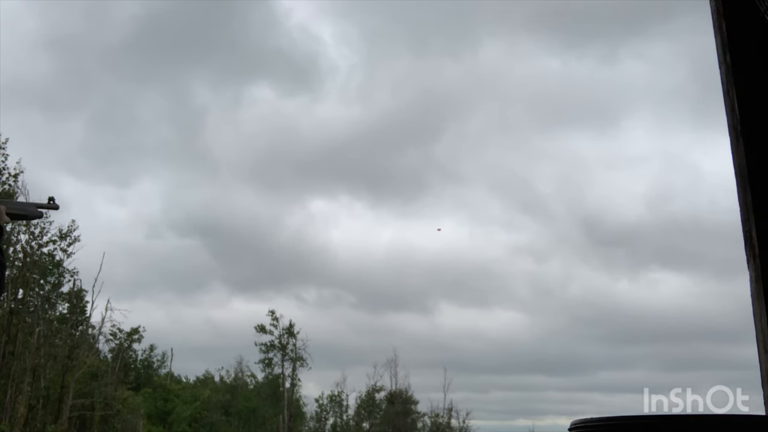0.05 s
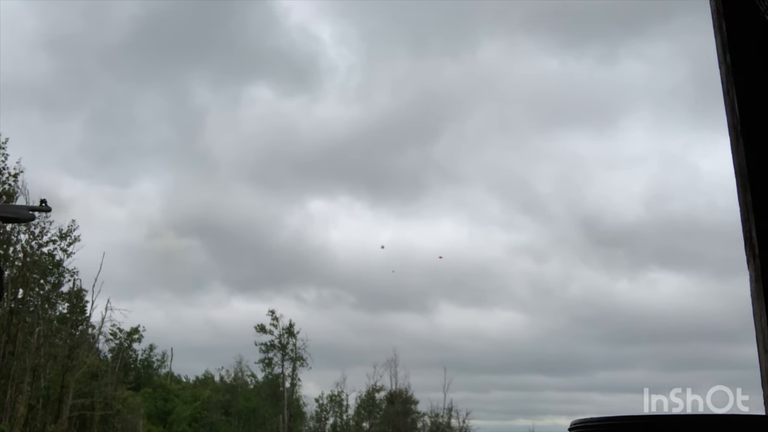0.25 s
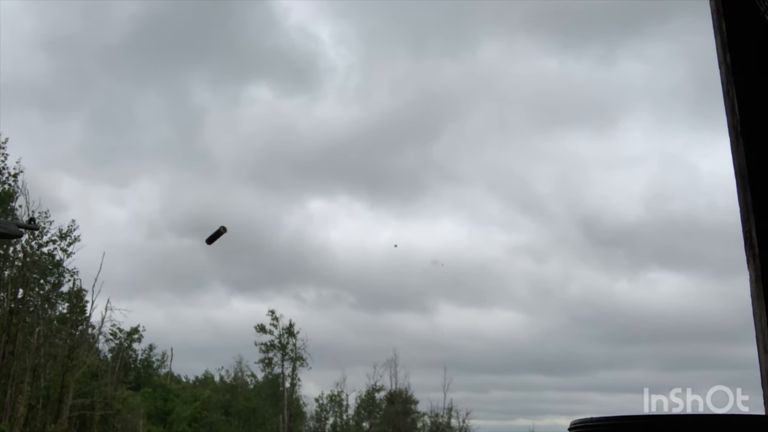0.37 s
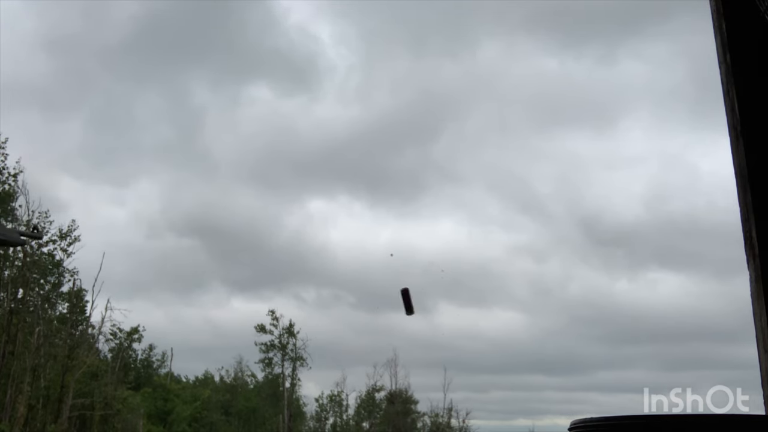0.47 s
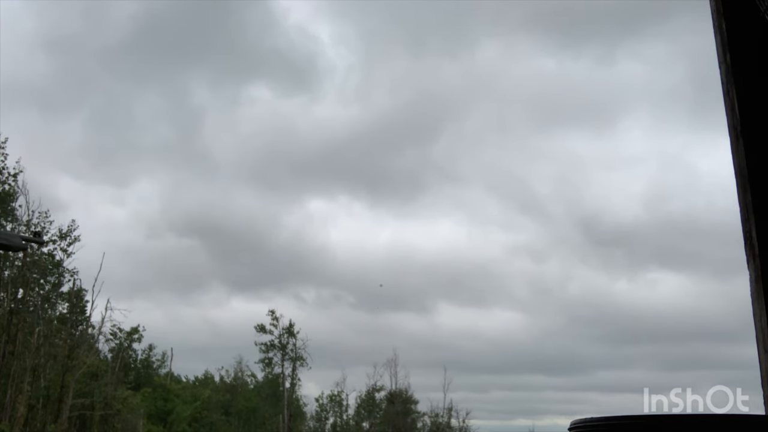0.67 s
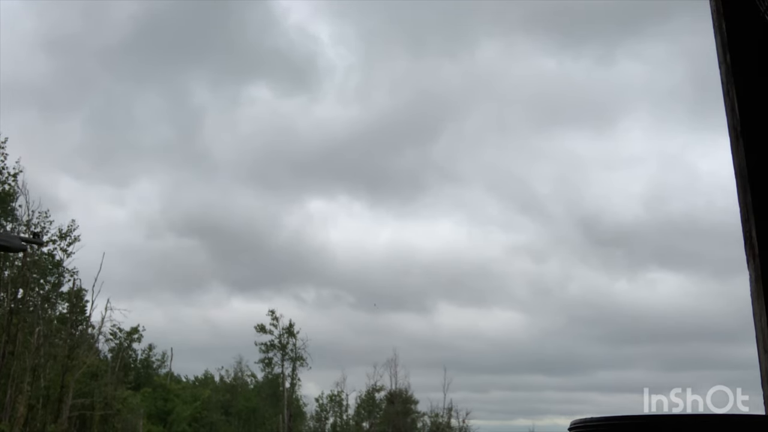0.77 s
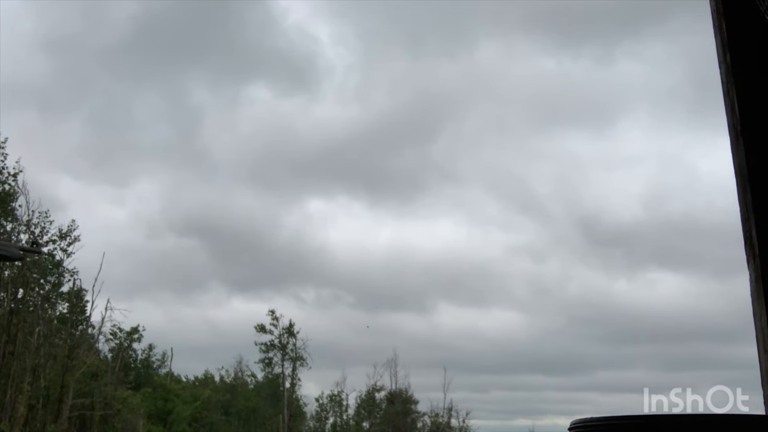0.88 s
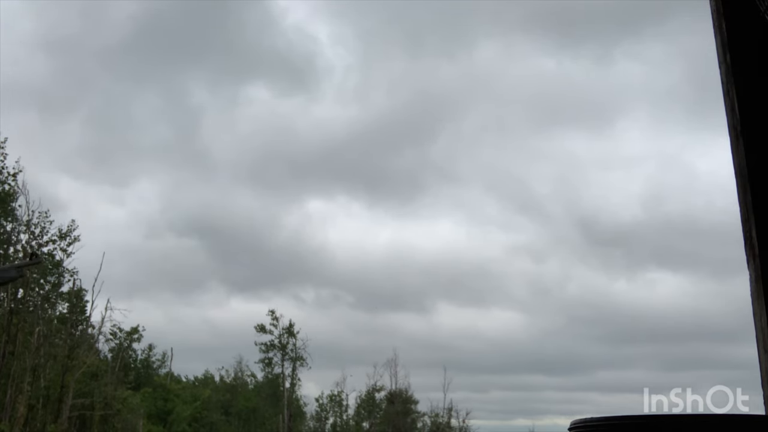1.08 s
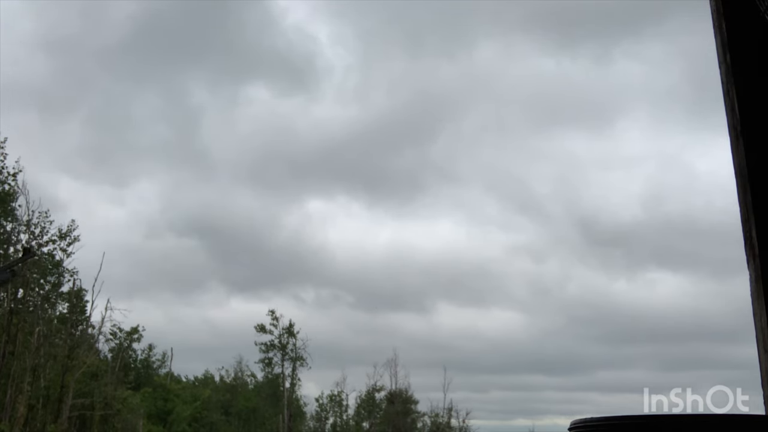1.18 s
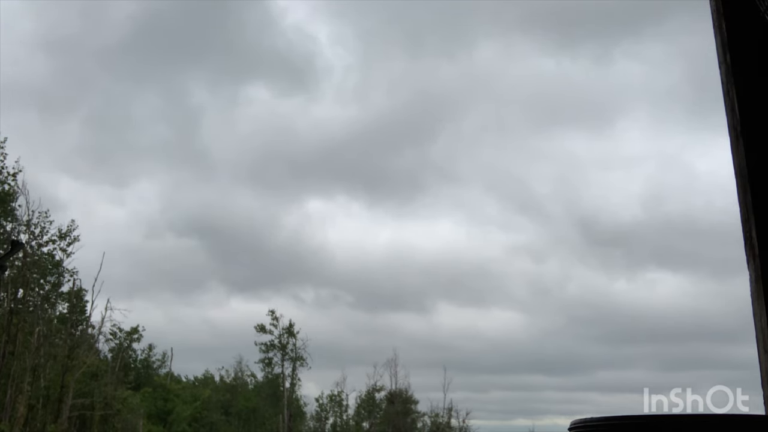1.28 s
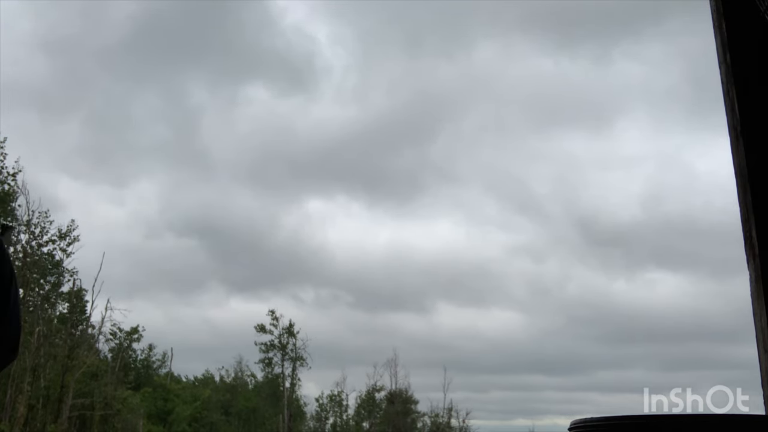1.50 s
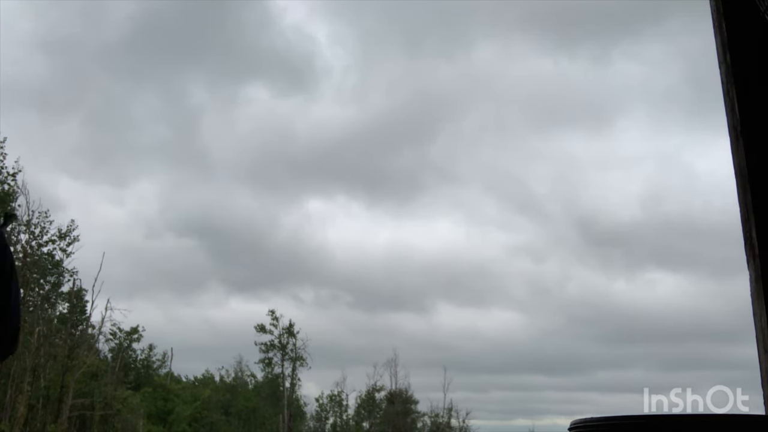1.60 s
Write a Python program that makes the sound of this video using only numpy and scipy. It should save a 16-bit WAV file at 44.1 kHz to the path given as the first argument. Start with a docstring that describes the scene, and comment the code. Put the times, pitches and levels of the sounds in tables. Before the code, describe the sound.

A shotgun fires once, close to the microphone, with a hard crack and a loud blast. The echo rolls back from the trees around a clearing, followed by faint clicks and knocks of the gun being handled.

```python
"""A clearing ringed by trees: one shotgun shot at a clay target, close to a two-port microphone.
A hard crack opens into a bright blast with low pressure thumps that overloads the microphone,
and the barrel rings on. Nearby things slap the shot back; the tree lines roll it back, duller
with distance. The gun clicks and knocks faintly as it is handled, over a light gust and low rumble."""
import sys
import numpy as np
from scipy import signal
from scipy.fft import rfft, irfft
from scipy.io import wavfile

SR = 44100
rng = np.random.default_rng(int(sys.argv[2]) if len(sys.argv) > 2 else 0)


def to_wav(s):
    """Save 16-bit WAV."""
    ch = np.atleast_2d(s).T  # columns
    pcm = np.round(np.clip(ch, -1, 1) * 32767)  # PCM
    wavfile.write(sys.argv[1], SR, pcm.astype(np.int16))


N = 72765
T, HZ = np.arange(N) / SR, np.fft.rfftfreq(N, 1 / SR)
CRACK_S, BLAST_S, SNAP_S, BLAST_RISE_S = .1962, .215, .218, .011


# the crack close up, at the left and right port (frequency [Hz], level [dB])
CRACK_LEFT = [(40, -21), (130, -12.5), (320, -1.5), (700, -4.5), (1050, -15.5), (1750, 3), (2500, -10.5),
              (3200, -3), (4600, -6), (6000, -18), (7400, -7)]
CRACK_RIGHT = [(40, -20.5), (130, -3), (320, 1), (750, -6.5), (1130, -1), (1550, -16.5), (2100, 0),
               (2600, -16.5), (4300, -8.5), (6000, -17), (7400, -14)]
def crack():
    """The first hard burst overloads the microphone; its bass swells just behind the rest."""
    burst = noise(np.array([read(CRACK_LEFT), read(CRACK_RIGHT)]))
    bass = filtered(burst, lowpass(614, slope=4))
    attack = (burst - bass) * rise(CRACK_S, .0055) ** 2 + bass * rise(CRACK_S, .014) ** 2
    drive, hold_s = .44, .017
    overloaded = np.tanh(drive * attack * amp(fall_db(CRACK_S + hold_s, t60=.09))) / drive
    return amp(-5) * filtered(overloaded, np.sqrt(lowpass(7730, slope=90)))


# the blast close up (frequency [Hz], level [dB])
BLAST_COLOUR = [(25, -7), (42, -3), (62, -16.5), (110, -4), (200, -2), (450, -2), (800, -2.5), (1500, -7),
                (2200, -8.5), (3300, -9.5), (5000, -15), (7000, -15.5), (9000, -15.5), (14000, -16),
                (16000, -20)]
# how long it rings (frequency [Hz], t60 [s])
BLAST_T60 = [(40, 0.48), (120, 0.24), (400, 0.28), (1200, .25), (3000, 0.24), (7000, 0.24), (14000, 0.1)]
# resonances around the shooter (frequency [Hz], width [Hz], boost [dB])
RESONANCES = [(136, 9, 7.5), (318, 33, 6.5), (461, 30, 5), (548, 12, 8.5), (629, 39, 9.5), (972, 27, 12),
              (1089.6, 49, 13.5), (1272, 35, 11), (1790, 45, 6.5)]
def blast():
    """The roar rings the surroundings and dies, treble first; a near wall of trees throws it back."""
    rings_db = sum(db * np.exp(-((HZ - hz) / width) ** 2) for hz, width, db in RESONANCES)
    burst = noise(read(BLAST_COLOUR) + rings_db, pan_db=1)
    roar = by_band(burst, lambda hz: fall_db(BLAST_S + .0033, read(BLAST_T60, hz)), count=14)
    bounce_db = 1.5 * bell(.2495, width_s=.012)
    return amp(-9 + bounce_db) * rise(BLAST_S, BLAST_RISE_S) * roar


# the bright top of the blast (frequency [Hz], level [dB])
SNAP_COLOUR = [(500, -23.5), (6000, -3.5), (9000, -5), (13500, 0), (16000, -5.5)]
def snap():
    """A sharp snap tops the blast; nearby leaves scatter it into a faint sizzle."""
    colour = read(SNAP_COLOUR)
    direct = noise(colour) * rise(SNAP_S, .0012) * amp(-11.5 + fall_db(SNAP_S, t60=.022))
    sizzle = noise(colour) * rise(SNAP_S, BLAST_RISE_S) * amp(-40 + fall_db(SNAP_S, t60=.45))
    return direct + sizzle


# pressure pulses at the microphone (time [s], peak [linear], length [s])
THUMPS = [(0.2175, .14, .002), (0.2265, 0.33, 0.0016), (0.245, .11, 0.0018)]
def thumps():
    """The pressure wave and its near reflections: each a push between two suctions."""
    return sum(peak * (1 - ((T - s) / length) ** 2) * np.exp(-((T - s) / length) ** 2 / 2)
               for s, peak, length in THUMPS)


BARREL_HZ, BARREL_WIDTH_HZ = (2860, 3235, 3270), 24
def barrel():
    """A few narrow steel modes of the barrel, struck by the shot."""
    modes = sum(1 / (1 + ((HZ - hz) / BARREL_WIDTH_HZ) ** 2) for hz in BARREL_HZ)
    envelope = rise(BLAST_S, BLAST_RISE_S) * amp(-29 + fall_db(BLAST_S, t60=.33))
    return noise(20 * np.log10(modes)) * envelope


# returns from things nearby, then from the edge of the wood (time [s], level [dB], pitch [Hz])
SLAPS = [(.2124, -10, 310), (0.2323, -11, 1007), (.2509, -14, 408), (.2726, -18, 442), (.314, -28.5, 333),
         (.5227, -34, 1240), (.5238, -34, 570), (.5379, -30, 1200), (0.7078, -29.5, 810),
         (0.7139, -37, 870), (0.719, -31, 970), (0.7321, -36, 1000), (0.739, -33.5, 905)]
def slaps():
    """Separate hollow returns, each a few cycles long, reaching the left port first."""
    port_time = T - np.array([[0], [.0001]])
    out = 0
    for s, db, hz in SLAPS:
        cycles = hz * (port_time - s)
        out += amp(db) * np.exp(-(cycles / 1.4) ** 2) * np.cos(2 * np.pi * (cycles + rng.random()))
    return out


# tree lines, near to far (peak time [s], level [dB], rise [s], t60 [s], treble [dB])
TREE_LINES = [(0.392, -47, 0.035, 0.92, 2), (0.481, -40, 0.045, 1, -3), (0.538, -34.5, 0.032, 0.64, -2),
              (0.636, -34, 0.024, 0.3, -5), (0.716, -43, 0.036, 0.68, 4),
              (0.755, -35.5, 0.0097, 0.071, -19), (0.807, -45, 0.014, 0.39, -5.5),
              (.85, -47, 0.036, 1, 0.5), (1.12, -52.5, .05, 0.27, -3.5), (1.21, -57.5, 0.1, 0.99, 4.5),
              (1.6, -62, 0.043, 0.51, -1)]
# the shot heard back from the trees (frequency [Hz], level [dB])
ECHO_COLOUR = [(30, -14), (70, -9.5), (160, -3.5), (240, -9.5), (420, -1.5), (580, -1), (750, -4.5),
               (1050, -2.5), (1450, -9.5), (1750, -6.5), (2200, -10.5), (4500, -18), (8000, -29),
               (12000, -41), (16000, -44.5)]
def echoes():
    """Each tree line scatters a grainy swell back; the air takes treble from the later ones."""
    def level_db(hz):
        treble = hz ** 2 / (hz ** 2 + 1604 ** 2)
        power = 0
        for s, db, rise_s, t60, treble_db in TREE_LINES:
            swell = np.exp(-(np.minimum(T - s, 0) / rise_s) ** 2)
            power += swell * amp(db + treble_db * treble + fall_db(s, t60)) ** 2
        air_db_per_s = 6 * min(hz, 4500) / 1000
        return 10 * np.log10(power + 1e-20) - air_db_per_s * (T - .59)

    grain_db = np.interp(T / .003, np.arange(N), rng.standard_normal(N))  # a new level every 3 ms
    roll = by_band(noise(read(ECHO_COLOUR), pan_db=.5), level_db, count=8)
    return roll * amp(grain_db) * rise(BLAST_S, BLAST_RISE_S)


# the gun's action, close by (time [s], level [dB], treble [dB])
CLICKS = [(0.597, -58, 9.5), (.610, -63, 8), (1.019, -74.5, 5), (1.101, -65.5, 2.5), (1.119, -70.5, 1),
          (1.167, -80, 5), (1.209, -72, 1), (1.218, -65, 4.5), (1.306, -73, 0), (1.429, -76, 7),
          (1.49, -80, 0)]
# the clicks' bright ringing colour as picked up, with two hollows in the high treble
# (frequency [Hz], level [dB])
CLICK_COLOUR = [(800, -23), (3000, -16), (3700, 12), (4000, 10), (4420, 17.5), (4900, -1), (5600, 2),
                (6500, 7), (8000, 4.5), (9400, -12), (10500, 3), (13600, -14), (14900, 2), (16000, -15)]
def clicks():
    """Small steel parts tick and ring briefly, some brighter than others."""
    ringing = noise(read(CLICK_COLOUR))
    treble = filtered(ringing, 1 - lowpass(5500, slope=10))
    out = 0
    for s, db, treble_db in CLICKS:
        tick_and_ring = amp(fall_db(s, t60=.035)) + amp(-5 + fall_db(s, t60=.19))
        out += (ringing + (amp(treble_db) - 1) * treble) * rise(s, .001) * amp(db) * tick_and_ring
    return out


# bumps on the stock, close by (time [s], level [dB], pitch [Hz])
KNOCKS = [(1.043, -47, 483), (1.072, -49.5, 352), (1.164, -49.5, 366)]
def knocks():
    """Each soft bump rings the stock with one dull note."""
    return sum(rise(s, .0052) * amp(db + fall_db(s, t60=.08)) * np.sin(2 * np.pi * hz * (T - s))
               for s, db, hz in KNOCKS)


# wind on the microphone (frequency [Hz], level [dB])
WIND_COLOUR = [(20, -19), (45, 7), (80, 7), (130, -7), (220, -37), (1000, -57)]
def wind():
    """One light, slow gust rumbles on the microphone."""
    return amp(-64.5) * noise(read(WIND_COLOUR)) * bell(1.12, width_s=.21)


# hiss and rumble of the clearing, all around (frequency [Hz], level [dB])
HISS = [(30, -8.5), (80, -3), (580, -7), (1000, -10.5), (4600, -12), (5500, -20.5), (8000, -27),
        (10000, -37), (16000, -51)]
RUMBLE = [(25, -13), (60, -4.5), (170, -15), (240, -25.5), (340, -8.5), (430, -5), (520, -14.5),
          (620, -11), (1050, -17), (1650, -24.5), (5000, -36.5), (16000, -55.5)]
def air():
    """A low outdoor rumble, and a faint hiss that drops away after the shot."""
    hiss = amp(-56) * noise(read(HISS)) * (1 - rise(CRACK_S, .4))
    return hiss + amp(-64.5) * noise(read(RUMBLE))


# how alike the two microphone ports hear (frequency [Hz], likeness [0-1])
PORT_LIKENESS = [(40, 0.9), (130, 1), (300, 0.8), (600, 0.6), (1100, 0.25), (1800, 0.3), (3000, 0),
                 (6000, 0), (7300, 0.3), (12000, 1)]
def noise(colour_db, pan_db=0, lag_s=.00017):
    """Coloured noise at the two ports, level 1 before panning, reaching the left one first."""
    left, unrelated = np.exp(2j * np.pi * rng.random((2, len(HZ))))
    same = read(PORT_LIKENESS)
    right = same * left * np.exp(-2j * np.pi * HZ * lag_s) + np.sqrt(1 - same ** 2) * unrelated
    x = irfft(np.array([left, right]) * amp(colour_db), N)
    return x / x.std() * amp([[pan_db], [-pan_db]])


def amp(db):
    """Decibels to gain."""
    return 10 ** (np.asarray(db) / 20)


def read(points, hz=HZ):
    """Joins points with straight lines on a log-frequency axis."""
    f, value = np.transpose(points)
    return np.interp(np.log(hz + 1), np.log(f + 1), value)


def lowpass(hz, slope):
    """A gain curve that falls away above hz."""
    return 1 / (1 + (HZ / hz) ** slope)


def filtered(x, gain):
    """Scales each frequency of x by its gain."""
    return irfft(rfft(x) * gain, N)


def by_band(x, level_db, count):
    """Gives each band of x its own course in time, level_db(hz)."""
    centres = np.geomspace(40, 16000, count)
    return sum(filtered(x, read(np.c_[centres, band])) * amp(level_db(hz))
               for hz, band in zip(centres, np.eye(count)))


def rise(start, rise_s):
    """A straight attack."""
    return np.clip((T - start) / rise_s, 0, 1)


def fall_db(start, t60):
    """An even decay from start on."""
    return -60 * np.maximum(T - start, 0) / t60


def bell(peak_s, width_s):
    """A smooth swell and fade."""
    return np.exp(-((T - peak_s) / width_s) ** 2)


def scene():
    """The shot, its echoes and the handling over the open air."""
    shot = crack() + blast() + snap() + thumps() + barrel()
    return shot + slaps() + echoes() + clicks() + knocks() + wind() + air()


def record(dry):
    """The microphone rounds off the loudest peaks; then the highest treble is cut."""
    ceiling, edge_hz = .94, 15950
    rounded = dry / (1 + (dry / ceiling) ** 8) ** (1 / 8)
    band_limit = signal.firwin(511, edge_hz, window=("kaiser", 9), fs=SR)
    return signal.oaconvolve(rounded, band_limit[None], "same")


dry = scene()
out = record(dry)
to_wav(out)
```